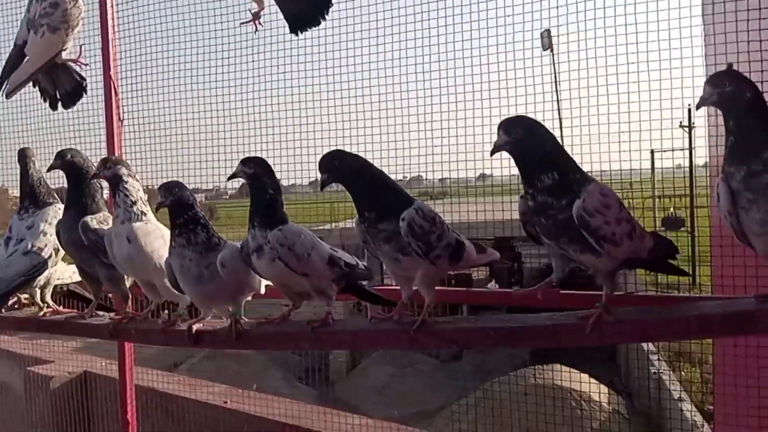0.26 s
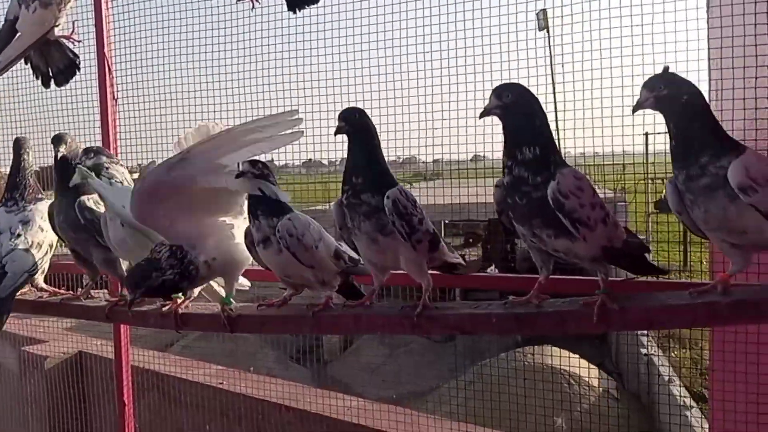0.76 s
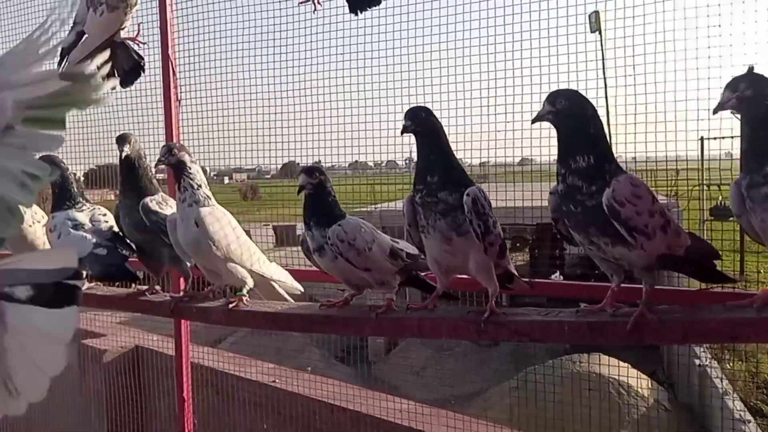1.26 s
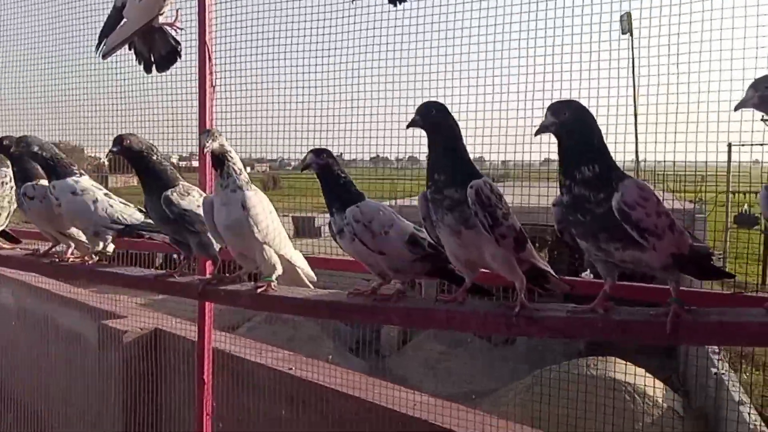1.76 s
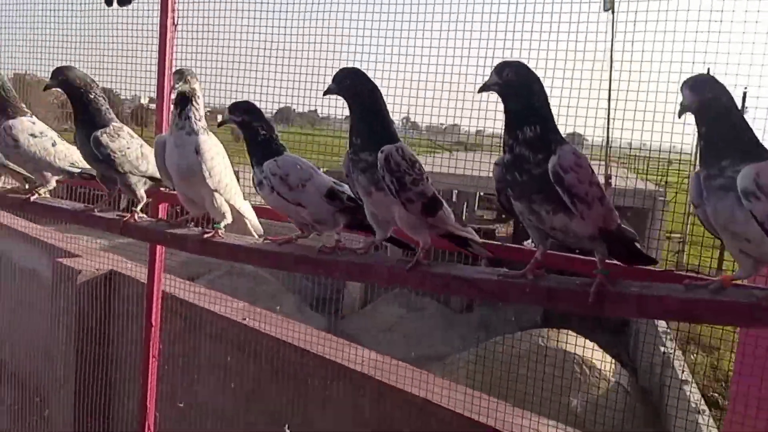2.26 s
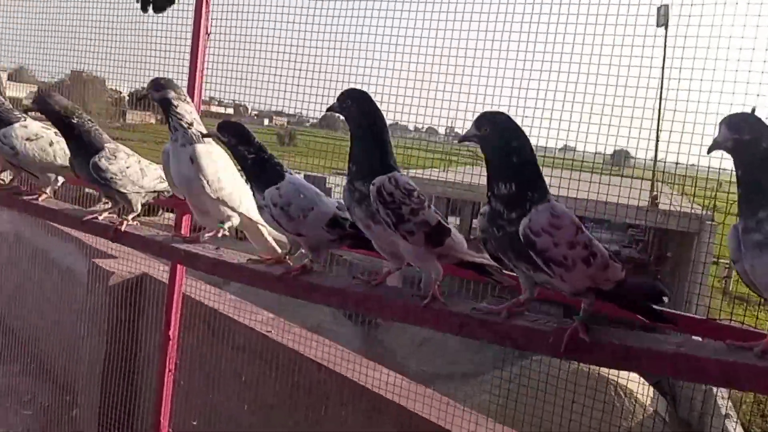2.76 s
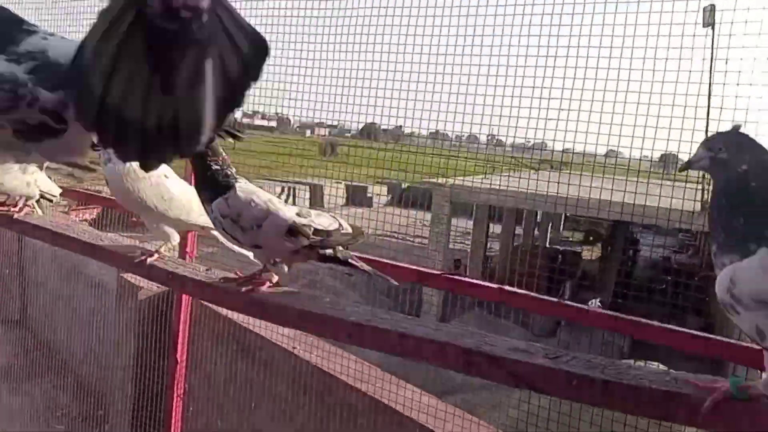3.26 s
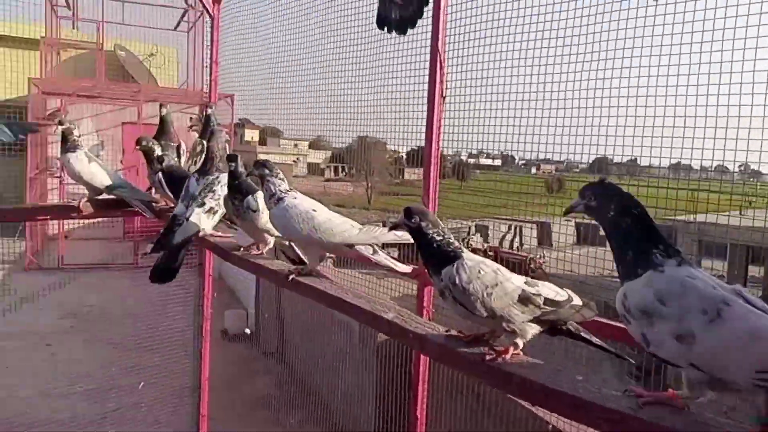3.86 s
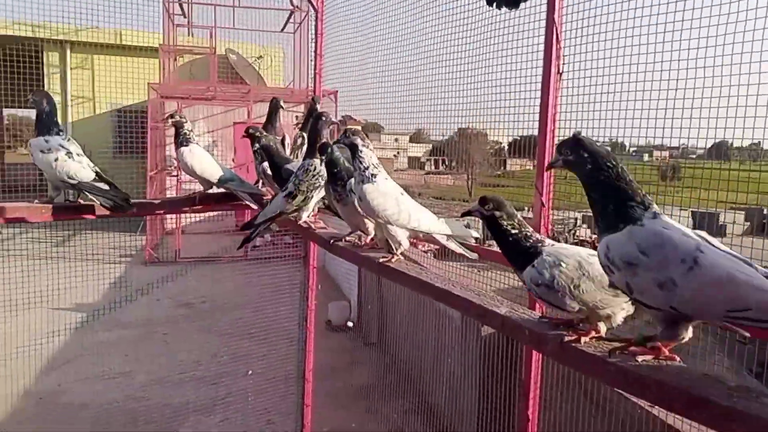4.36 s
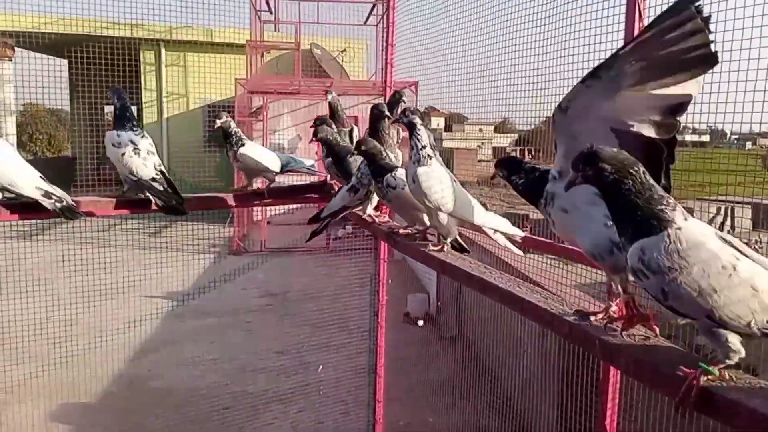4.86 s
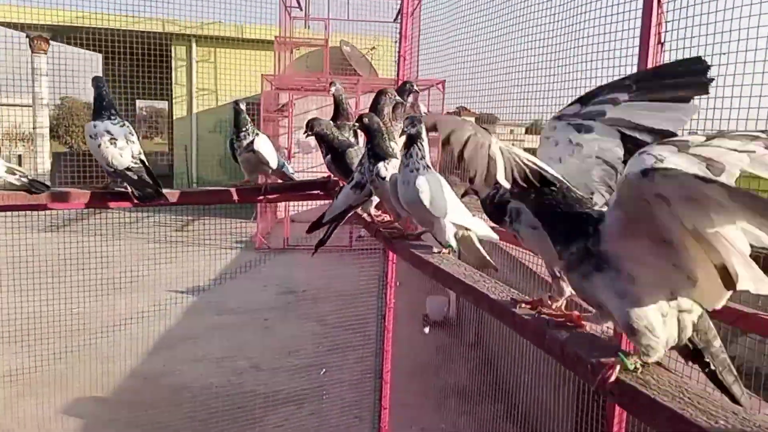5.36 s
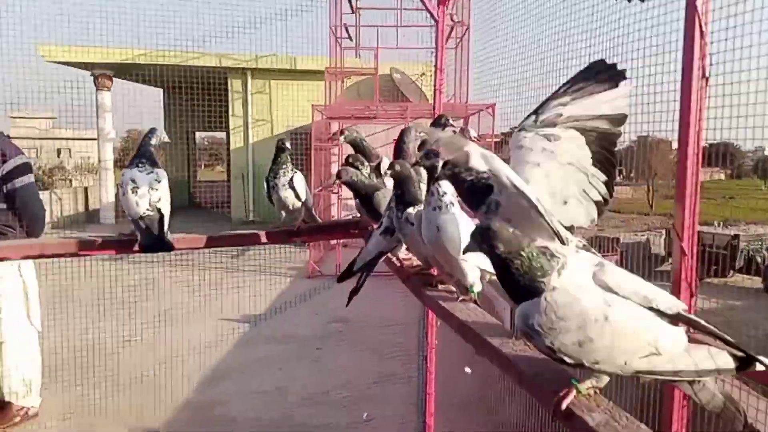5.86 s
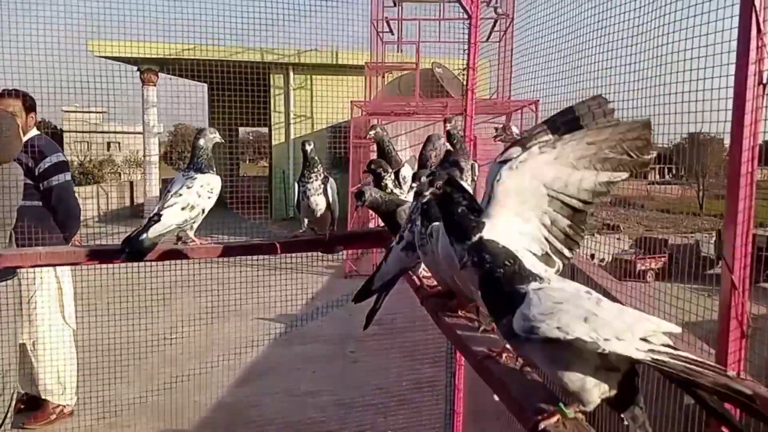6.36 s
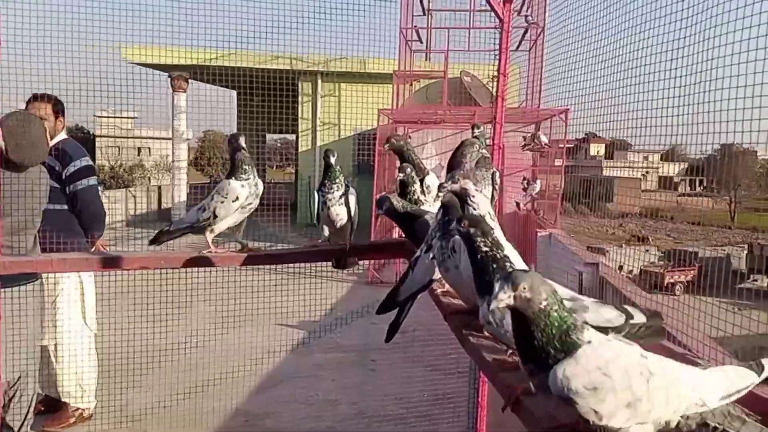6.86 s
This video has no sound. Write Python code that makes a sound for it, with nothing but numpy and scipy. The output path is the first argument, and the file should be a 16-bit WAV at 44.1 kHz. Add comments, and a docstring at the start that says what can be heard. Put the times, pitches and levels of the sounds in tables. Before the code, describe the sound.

Close pigeons flap in three bouts inside an open-air wire loft: a short flurry, a louder burst of claps and rustling feathers that buffets the microphone, then a longer run of lighter wingbeats. One soft coo follows the first bout and another comes during the last. Throughout, the birds give clipped clucks and their claws tap the metal perch and mesh, over a faint distant town drone.

```python
"""Pigeons crowd a steel perch in a wire loft on an open roof, close to a small microphone.
Over a far town rumble, birds cluck and shuffle, their feet ringing perch and mesh. At 1 s a wing claps
and a flurry follows: feathers rustle and push air at the microphone. Just after 2 s a bird coos, pulses
ringing its throat pouch. The biggest burst of flapping comes at 3-4 s. Near 5 s the town's drone drops
back; lighter wingbeats follow, with a second bird's coo around 6 s."""
import sys
import numpy as np
from scipy import signal
from scipy.io import wavfile
from scipy.ndimage import uniform_filter1d

SR = 44100
rng = np.random.default_rng(int(sys.argv[2]) if len(sys.argv) > 2 else 0)


def log_audio(samples):
    """Write samples as a 16-bit WAV file to the path given in sys.argv[1]."""
    # one column per channel
    frames = np.atleast_2d(samples).T
    # limit to full scale, then quantise
    limited = np.clip(frames, -1, 1)
    pcm = np.round(limited * 32767).astype(np.int16)
    wavfile.write(sys.argv[1], SR, pcm)


N = 313110
T = np.arange(N) / SR

# EQ curves for distant town wash, air on the microphone and feather rustle: f/Hz, level/dB
TOWN_EQ = [(15, -41.5), (25, -34), (103, 0.5), (182, -15.5), (226, -13), (378, -15), (902, -31.5),
           (1600, -5.5), (2530, -13), (3320, -44.5), (6380, -36), (8140, -41), (13300, -50.5),
           (15200, -6.5), (16500, -46.5)]
DRAUGHT_EQ = [(15, -31.5), (25, -13), (69, 5.5), (124, 9), (243, -1), (291, 4.5), (406, -2.5), (626, -7),
              (700, -1), (910, -41), (1540, -120)]
FEATHER_EQ = [(180, -32.5), (300, -4.5), (627, -9.5), (1310, -7.5), (2100, -4), (3300, 9), (4600, 2),
              (6200, -11.5), (7300, -18.5), (8300, -30.5), (10500, -29), (13300, -29), (15100, -6),
              (16500, -25.5)]
# faint hum under the opening: f/Hz, level/dB
HUM_TONES = [(233, -71)]
# ringing modes of the steel perch and mesh: f/Hz, level/dB, t60/s
PERCH_MODES = [(1282, -16.5, 0.11), (1602, -13, 0.071), (2225, -11.5, 0.087), (2580, -10.5, .08),
               (2956, -9.5, .06), (3240, -4.5, .08), (3580, -7, 0.065), (3953, -8.5, 0.065),
               (4476, -8, 0.081), (4900, -12.5, 0.041), (5610, -17.5, 0.064), (6480, -17, 0.044)]
# claws plucking mesh and perch: t/s, level/dB, f/Hz, t60/s, noisiness/0-1
CLAW_TINKS = [(2.56, -53, 3550, 0.077, 0), (2.82, -58, 2810, 0.12, 0), (3.87, -43, 3230, 0.076, .06),
              (4.27, -49, 3250, 0.066, 0.2), (4.55, -57, 2180, .08, 0), (4.8, -62.5, 11350, .083, .45),
              (4.948, -55, 6660, 0.049, 0.1), (5.133, -55.5, 6500, .07, 0.6), (5.75, -64, 9900, .04, 0.5),
              (6.33, -52, 7260, .06, 0.7), (6.508, -27, 4600, 0.02, 0.4), (6.877, -67, 7960, .043, .3)]
# short clucks and hollow knocks: t/s, level/dB, f/Hz, t60/s, noisiness/0-1
CLUCK_CUES = [(0.003, -47.5, 337.5, 0.28, 0.09), (0.084, -53.5, 344, 0.09, 0.4),
              (0.614, -59.5, 533, 0.23, 0.1), (0.674, -47, 726, 0.11, 0.36),
              (0.746, -40.5, 727, 0.12, 0.43), (0.819, -48, 758, 0.052, 0.65),
              (0.874, -48, 536, 0.15, 0.98), (0.939, -51.5, 653, 0.067, 0.15),
              (1.025, -33.5, 860, 0.033, 0.86), (1.282, -29.5, 354, 0.07, 0.98),
              (1.42, -27.5, 299, 0.13, 0.68), (1.666, -41.5, 902, 0.29, 0.5),
              (1.777, -36, 890, 0.061, 0.39), (1.848, -51, 720, 0.075, 0.2), (2.117, -48, 795, 0.13, 0.4),
              (2.287, -33, 404, 0.062, 0.9), (3.13, -25, 520, 0.061, 0.81), (3.187, -27, 710, 0.069, 1),
              (3.256, -31.5, 960, 0.26, 0.76), (3.308, -24.5, 299, 0.15, 0.51),
              (3.389, -28, 690, 0.18, 0.64), (3.438, -26, 286, 0.1, 0.65), (3.52, -24.5, 280, 0.11, 0.5),
              (3.557, -24, 643, 0.077, 0.57), (3.68, -23, 914, 0.062, 0.94), (3.804, -35, 332, 0.15, 0.54),
              (3.931, -48, 567, 0.11, 0.7), (4.804, -51, 355, 0.11, 0.24), (5.204, -36.5, 710, 0.054, 1),
              (5.27, -44.5, 500, 0.13, 0.94), (5.345, -53.5, 581, 0.28, 0.52),
              (5.456, -34, 399, 0.15, 0.34), (5.5, -42, 374.5, 0.14, 0.5), (5.59, -56.5, 382, 0.3, 0.4),
              (5.746, -42.5, 525, 0.11, 0.23), (6.27, -43.5, 427, 0.056, 0.6),
              (6.335, -46.5, 521, 0.18, 0.33), (6.416, -49, 327, 0.14, 0.02), (6.632, -36, 294, 0.12, 0.56),
              (6.716, -36.5, 600, 0.18, 0.97), (6.736, -31.5, 320, 0.092, 0.92),
              (6.993, -51, 704, 0.21, 0.3), (7.06, -55.5, 343, 0.3, 0.2)]
# two coos of two phrases each: pouch f/Hz, pouch spread/Hz, roughness/0-1,
# then a contour of t/s, pulse rate/Hz, level/dB, strong-weak alternation/ratio
COO_PHRASES = [(509, 68, 0.2, [(2.13, 176.4, -53, .5), (2.178, 165.8, -45, 1), (2.206, 155.2, -38, 0),
               (2.256, 151, -44.5, 0), (2.29, 149.8, -41, .2)]), (414, 78, 0.18, [(2.29, 146.5, -46, .1),
               (2.358, 143.5, -43, 0.018), (2.41, 141.6, -53, 0.082), (2.518, 134, -56.5, 0.12),
               (2.56, 142, -70, .02)]), (487, 48, 0.3, [(5.9, 154.4, -63, .5), (5.912, 162.3, -40.5, 0.27),
               (5.93, 170.6, -41, 0.74), (5.96, 156, -37.5, 2.7), (6.0, 158, -35.5, 0.17),
               (6.05, 149.5, -40, 0.85)]), (438, 64, .2, [(6.05, 138.1, -46.5, .1), (6.164, 145, -44, 0.26),
               (6.198, 138.4, -46, 0.36), (6.22, 145.1, -59, .2)])]
# the flock's steady bed of movement: t/s, rustle level/dB, draught level/dB
FLOCK_STIR = [(0.0, -58.5, -64.5), (0.34, -67, -72), (0.67, -55.5, -62.5), (1.14, -55.5, -73),
              (1.42, -42.5, -51), (1.54, -32.5, -53), (1.76, -60.5, -69), (1.92, -63, -68.5),
              (2.51, -65.5, -67.5), (3.0, -62, -73.5), (3.16, -42.5, -54), (3.3, -36, -35),
              (3.42, -29, -47), (3.68, -32, -36), (3.76, -29.5, -56), (3.85, -54, -48), (3.97, -50.5, -64),
              (4.71, -60, -66), (4.86, -62, -70), (5.85, -58, -68.5), (6.19, -52, -66.5),
              (6.47, -52.5, -67), (6.84, -64, -71.5), (7.1, -60, -65)]
# wing strokes: centre t/s, length/s, rustle level/dB, swish re rustle/dB, fizz re rustle/dB,
# draught level/dB, thud level/dB
WING_STROKES = [(0.071, 0.077, -52.5, -11, -13, -62, -82), (0.293, 0.094, -56.5, -12, -6.5, -66, -70),
                (0.568, 0.3, -56, -14, -7, -67, -83), (0.843, 0.13, -55, -6, -9, -66, -60),
                (1.047, 0.076, -58, -9, -33, -46.5, -71), (1.18, 0.073, -46.5, -1.5, -13, -55, -54),
                (1.237, 0.089, -38, -0.5, -30, -45.5, -68), (1.277, 0.079, -42, -2, -3, -42.5, -42.5),
                (1.361, 0.17, -32, -2, -10.5, -39.5, -44), (1.439, 0.041, -33.5, -0.5, -14, -44, -54),
                (1.539, 0.06, -27, -4, -18, -53, -54), (1.552, 0.037, -34, -8, -6, -57, -50),
                (1.609, 0.091, -41.5, 0.5, -39, -47.5, -49), (1.665, 0.098, -40, 2, -27, -63, -52),
                (1.804, 0.27, -57, -5, -9, -60.5, -49.5), (2.024, 0.1, -55, -8, -12, -73, -73),
                (2.134, 0.092, -49, -1.5, -25, -69, -78), (2.211, 0.2, -51, -5, -20, -60, -73),
                (3.155, 0.09, -29.5, -5.5, -9, -41, -44), (3.27, 0.068, -22, -7, -10, -35.5, -50),
                (3.311, 0.059, -34, -3, -6, -39, -55), (3.404, 0.1, -31, -1.5, -11, -30.5, -46),
                (3.478, 0.12, -29.5, -3, -7, -29.5, -40), (3.535, 0.068, -24.5, -5.5, -6, -27.5, -53),
                (3.621, 0.044, -40, 4.5, -14, -33.5, -54), (3.722, 0.09, -39, 5, -8, -39, -47),
                (3.795, 0.17, -33.5, -3, -14.5, -34.5, -43), (3.968, 0.086, -45.5, -11, -8, -74, -61),
                (4.374, 0.1, -54, 0.5, -15, -77, -78), (4.951, 0.046, -51.5, -17, -7, -86, -75),
                (5.142, 0.069, -53, -9, -6, -67, -80), (5.217, 0.086, -39, -5, -9.5, -59, -85),
                (5.289, 0.079, -39.5, -7, -9, -61, -85), (5.491, 0.087, -50, -21, -14, -75, -76),
                (5.673, 0.055, -54, -9, -13, -58, -77), (6.002, 0.2, -42.5, -5, -13.5, -59, -77),
                (6.136, 0.095, -47, -11, -16, -74, -84), (6.377, 0.056, -37.5, -12, -15, -59, -79),
                (6.526, 0.091, -34.5, -7.5, -20, -55, -80), (6.645, 0.077, -38, 3.5, -26, -63, -78),
                (6.744, 0.095, -39.5, 4, -27, -39.5, -39.5), (6.971, 0.061, -48, -12, -8, -64, -82),
                (7.09, 0.049, -53, -10, -12, -76, -78)]
# wing claps and claw ticks: t/s, mid-band peak/dB, low slap level/dB, high snap level/dB, ring f/Hz,
# feather tail t60/s, feather noise re crack/dB
CLAP_CUES = [(0.1003, -39.5, -53.5, -65, 3470, 0.081, 16), (0.3704, -40.5, -60, -56, 3740, 0.15, 15),
             (0.561, -41, -64, -56, 3970, 0.1, -6), (0.6602, -27.5, -47.5, -36.5, 3370, 0.079, -14),
             (0.7493, -38.5, -48, -58, 3300, 0.23, 0), (0.8745, -34.5, -48, -60, 3630, 0.094, -6),
             (0.89, -25, -44.5, -45.5, 3870, 0.081, -7), (1.0261, -5.5, -22.5, -27, 3460, 0.13, -12.5),
             (1.1764, -42, -47, -69, 1680, 0.093, -11), (1.2137, -34, -51, -65, 3850, 0.1, -14),
             (1.2361, -23.5, -36.5, -41.5, 3580, 0.15, -1), (1.277, -22, -33, -55, 3650, 0.091, 5),
             (1.3167, -19.5, -27, -46, 1510, 0.042, 1), (1.4199, -19, -29, -38, 3500, 0.092, 0),
             (1.4769, -28, -32, -72, 3450, 0.36, 1), (1.668, -16, -36, -36, 3780, 0.085, -10),
             (1.716, -34, -43.5, -66, 3370, 0.12, 3), (1.7708, -54, -43.5, -64, 3400, 0.18, 7),
             (1.8317, -42, -49.5, -68, 2360, 0.11, 0), (1.8873, -41, -47, -76, 3230, 0.13, 4),
             (1.9785, -47, -59.5, -81, 3190, 0.09, -1), (2.013, -40, -61, -59, 3170, 0.17, -3),
             (2.1171, -16.5, -34, -31.5, 3360, 0.18, -10), (2.2805, -39.5, -50.5, -81, 3250, 0.36, -17),
             (2.382, -47.5, -54, -81, 3290, 0.086, -1), (2.5551, -38, -63, -62, 3540, 0.13, 4),
             (2.6717, -44.5, -65, -68, 3600, 0.12, -6), (2.7328, -37.5, -60, -63, 3800, 0.12, -1),
             (3.0669, -36, -55, -58, 2330, 0.076, -15), (3.1312, -14, -30, -33, 3200, 0.16, 7),
             (3.188, -17.5, -30.5, -34, 3440, 0.29, -11), (3.2165, -13, -43, -35, 2800, 0.19, -14),
             (3.259, -4, -19.5, -26, 3120, 0.058, -20), (3.2928, -4.5, -34, -23.5, 3070, 0.19, -24.5),
             (3.3388, -14.5, -32.5, -31.5, 3380, 0.05, -19), (3.3669, -17, -36, -31.5, 3340, 0.15, -24),
             (3.3858, -6.5, -22, -21, 3530, 0.095, -4), (3.459, -12.5, -31, -28.5, 3480, 0.13, -4.5),
             (3.519, -13, -29, -32.5, 3600, 0.075, -10), (3.5781, -1.5, -25.5, -24.5, 3450, 0.056, -34),
             (3.6826, -3.5, -23, -22.5, 3490, 0.059, -14.5), (3.7648, -28, -31, -49, 3050, 0.089, -10),
             (3.8223, -17.5, -31.5, -40, 3440, 0.04, 6), (3.922, -37, -55, -58, 2660, 0.12, -3),
             (3.935, -29, -46, -49, 3530, 0.069, -8), (4.2093, -39, -61, -57, 3080, 0.084, -9),
             (4.2672, -47, -52, -63, 3240, 0.12, -6), (4.4344, -40, -65, -62, 3220, 0.14, -6),
             (4.5496, -38.5, -58, -65, 3120, 0.11, -2), (4.8174, -43, -68, -55, 3480, 0.12, -6),
             (4.919, -42, -63, -54.5, 3210, 0.11, 3), (5.019, -42.5, -58.5, -65, 3160, 0.073, -9),
             (5.2024, -25.5, -37.5, -49, 3370, 0.066, 2), (5.277, -23.5, -42, -45, 3300, 0.059, -4),
             (5.345, -32.5, -52, -51.5, 3390, 0.15, -7), (5.4074, -35.5, -45.5, -57, 2880, 0.16, -13),
             (5.4867, -33.5, -51, -60, 3380, 0.11, 4), (5.5019, -31.5, -41.5, -51, 2980, 0.11, 0),
             (5.5547, -42, -51.5, -64, 1850, 0.077, 2), (5.6462, -44, -62, -59, 3200, 0.17, -2),
             (5.7114, -40, -58, -65, 3350, 0.2, -3), (5.7494, -23.5, -51, -42.5, 3500, 0.063, -14),
             (5.7947, -37, -57, -51, 3380, 0.13, 3), (5.8822, -30, -42, -57, 2310, 0.097, 8),
             (5.914, -29.5, -47, -50.5, 3320, 0.12, 1), (6.0025, -23, -28, -66, 2420, 0.047, -3),
             (6.0312, -26, -43, -44, 3520, 0.11, -2), (6.1492, -38.5, -69, -63, 3680, 0.12, 1),
             (6.2134, -24, -31.5, -55, 2410, 0.073, 8), (6.24, -21.5, -33, -53, 3140, 0.11, -9),
             (6.2701, -28.5, -55, -44, 3240, 0.24, -6), (6.3096, -26.5, -48, -44.5, 3160, 0.086, -3),
             (6.334, -23.5, -43, -41, 3330, 0.12, -4), (6.3655, -27, -58, -43, 3180, 0.13, -1),
             (6.4002, -14, -42.5, -32, 3520, 0.12, -18), (6.4448, -31, -45.5, -71, 2860, 0.1, -6),
             (6.4937, -34, -60, -50.5, 2900, 0.17, -9), (6.5211, -7, -36, -25, 3460, 0.04, 0),
             (6.573, -25, -44, -75, 2600, 0.13, -13), (6.6227, -22.5, -27.5, -59, 1720, 0.049, -11.5),
             (6.7242, -36, -37.5, -53, 3240, 0.19, 10), (6.8216, -34.5, -52, -53.5, 3200, 0.056, -7),
             (6.9042, -40, -57, -81, 3270, 0.15, -11), (6.975, -33, -53, -50.5, 3270, 0.072, -7)]

LOW_HZ, MID_HZ, HIGH_HZ = (480, 2000), (2000, 6000), (6000, 17000)


def gain_of(db):
    """Decibels to amplitude."""
    return 10 ** (np.asarray(db) / 20)


def unit_rms(x):
    """Normalises to rms 1."""
    return x / np.sqrt(np.mean(x ** 2) + 1e-20)


def add(mix, start_s, sound):
    """Lays a sound into the mix."""
    part = mix[max(round(start_s * SR), 0):][:len(sound)]
    part += sound[:len(part)]


def colour(x, eq, inlet_hz=3484, inlet_width_hz=1080, inlet_db=8):
    """Minimum-phase EQ, plus the presence peak of the microphone's resonating inlet."""
    eq_hz, eq_db = np.transpose(eq)
    hz = abs(np.fft.fftfreq(8192, 1 / SR))
    presence_db = inlet_db / (1 + (2 * (hz - inlet_hz) / inlet_width_hz) ** 2)
    curve_db = np.interp(np.log(hz + 1), np.log(eq_hz + 1), eq_db) + presence_db
    log_gain = np.log(gain_of(np.maximum(curve_db, -100)))
    taps = np.fft.ifft(np.exp(np.conj(signal.hilbert(log_gain)))).real[:4096]
    return signal.oaconvolve(x, taps)[:len(x)]


def band(x, edges_hz):
    """Band-pass filter."""
    return signal.sosfilt(signal.butter(3, edges_hz, "bandpass", fs=SR, output="sos"), x)


def resonate(x, hz, width_hz):
    """Two resonators in series; each shifts hz (steady or gliding) to zero, smooths and shifts back."""
    carrier = np.exp(2j * np.pi * np.cumsum(hz * np.ones(len(x))) / SR)
    pole = np.exp(-np.pi * width_hz / SR)
    for _ in range(2):
        x = 2 * (carrier * signal.lfilter([1 - pole], [1, -pole], x / carrier + 1e-18)).real
    return x


def wander(seconds):
    """Smooth random modulator of rms 1 that moves over about the given time."""
    size = max(round(seconds * SR), 2)
    return unit_rms(uniform_filter1d(uniform_filter1d(rng.standard_normal(N), size), size))


def town(wash_db=-75, drone_hz=116, drone_db=-63.5, drop_at_s=4.8, drop_db=-15.5, hum_ends_s=1.2):
    """Distant rumble and hiss, a low drone that drops back late, and a wavering hum that fades early."""
    wash = unit_rms(colour(rng.standard_normal(N), TOWN_EQ)) * gain_of(wash_db - 0.2 * wander(0.12))
    hum = sum(gain_of(db + 8.5 * wander(0.042)) * np.sin(2 * np.pi * hz * T) for hz, db in HUM_TONES)
    hum *= np.clip((hum_ends_s - T) / 0.36, 0, 1)
    drone = unit_rms(resonate(rng.standard_normal(N), drone_hz, width_hz=49))
    drone *= gain_of(drone_db + drop_db * np.clip((T - drop_at_s) / 0.11, 0, 1))
    return wash + drone + hum


def roof_echo(x, t60=0.42, predelay_s=0.0029):
    """Sparse reflections off the roof's floor and walls."""
    t = np.arange(round(.3 * SR)) / SR
    taps = rng.standard_normal(len(t)) * (rng.random(len(t)) < .05)
    taps *= (t > predelay_s) * gain_of(-60 * t / t60)
    return signal.oaconvolve(x, taps / np.linalg.norm(taps))[:N]


def perch(hits, steps_per_s=45, steps_re_rustle_db=-6, shake_db=-18.5):
    """Shuffling feet tap the steel, each tap waking its own mix of modes; claps shake it too."""
    stir_s, stir_db, _ = np.transpose(FLOCK_STIR)
    footfalls = np.flatnonzero(rng.random(N) < steps_per_s / SR)
    weight_db = 2.5 * np.minimum(rng.exponential(1, len(footfalls)), 3)
    timbre_db = 7.5 * rng.uniform(-1.1, 1, (len(footfalls), len(PERCH_MODES)))
    t = np.arange(round(.15 * SR)) / SR
    attack = np.minimum(t / 0.0019, 1)
    steps, ring = np.zeros(N), np.zeros(len(t))
    for (hz, db, t60), mode_db in zip(PERCH_MODES, timbre_db.T):
        mode = gain_of(db - 60 * t / t60) * np.sin(2 * np.pi * hz * t) * attack
        taps = np.zeros(N)
        taps[footfalls] = gain_of(weight_db + mode_db)
        steps += signal.oaconvolve(taps, mode)[:N]
        ring += mode
    shaken = gain_of(shake_db) * np.std(hits) * unit_rms(signal.oaconvolve(hits, ring)[:N])
    return unit_rms(steps) * gain_of(np.interp(T, stir_s, stir_db) + steps_re_rustle_db) + shaken


def blips(cues, attack_s, blur_hz, sag_per_s):
    """Short decaying tones, each blended with noise around its own pitch."""
    track, t = np.zeros(N), np.arange(round(.25 * SR)) / SR
    for start_s, db, hz, t60, noisiness in cues:
        pitch = hz * np.exp(-sag_per_s * t)
        tone = np.sqrt(2) * np.sin(2 * np.pi * np.cumsum(pitch) / SR)
        width_hz = blur_hz * (1 + 1.85 * noisiness ** 2)
        fuzz = unit_rms(resonate(rng.standard_normal(len(t)), pitch, width_hz))
        envelope = (1 - np.exp(-t / attack_s)) * gain_of(-60 * t / t60)
        blend = (1 - noisiness) * tone + noisiness * fuzz
        add(track, start_s, gain_of(db) * envelope / envelope.max() * blend)
    return track


def claw_tinks():
    """Claws pluck the wire and the perch: small, bright pings of steady pitch."""
    return blips(CLAW_TINKS, attack_s=0.0014, blur_hz=600, sag_per_s=0)


def clucks():
    """Clipped calls and hollow knocks that sag in pitch as they die."""
    return blips(CLUCK_CUES, attack_s=0.00047, blur_hz=122, sag_per_s=0.7)


def coo(pouch_hz, spread_hz, roughness, contour):
    """Pulses ring the inflated throat pouch; uneven pulse pairs add partials between the harmonics."""
    times, *curves = np.transpose(contour)
    t = np.arange(times[0], times[-1], 1 / SR)
    pulse_hz, db, alternation = (np.interp(t, times, curve) for curve in curves)
    cycles = np.cumsum(pulse_hz) / SR
    ratios = np.arange(2, 16)[:, None] / 2
    formant = np.exp(-.5 * ((ratios * pulse_hz - pouch_hz) / spread_hz) ** 2)
    partials = np.where(ratios % 1, alternation, 1) * formant
    voice = (partials * np.cos(2 * np.pi * ratios * cycles)).sum(0)
    voice /= np.sqrt((partials ** 2).sum(0) / 2)
    breath = unit_rms(resonate(rng.standard_normal(len(t)), pouch_hz, width_hz=180))
    blend = (1 - roughness) * voice + roughness * breath
    return times[0], gain_of(db) * blend * signal.windows.tukey(len(t), .08)


def stroke_envelope(bed_db, strokes_db):
    """Gain ride: the flock's steady stir plus one smooth swell of power per wing stroke."""
    power = gain_of(2 * np.interp(T, [row[0] for row in FLOCK_STIR], bed_db))
    for (centre_s, length_s, *_), db in zip(WING_STROKES, strokes_db):
        add(power, centre_s - length_s / 2, gain_of(2 * db) * np.hanning(round(length_s * SR)) ** 2)
    return np.sqrt(power)


def turning_wings(x, streak_db=3.5, shading_db=2.5):
    """Drifting random EQ: narrow streaks, and broad shading as the wings turn."""
    spectrum = signal.stft(x, nperseg=512, noverlap=384)[2]
    fine, broad = rng.standard_normal((2, *spectrum.shape))
    streaks = uniform_filter1d(uniform_filter1d(fine, size=16, axis=1), size=2, axis=0)
    shading = uniform_filter1d(uniform_filter1d(broad, size=14, axis=1), size=14, axis=0)
    drift_db = streak_db * unit_rms(streaks) + shading_db * unit_rms(shading)
    return signal.istft(spectrum * gain_of(drift_db), nperseg=512, noverlap=384)[1][:len(x)]


def feathers(crackles_per_s=260, crackle_db=-6):
    """Sliding feathers make a flickering hiss flecked with crackle."""
    hiss = rng.standard_normal(N) * gain_of(2 * wander(0.013) + 1.5 * wander(0.02))
    sizes = gain_of(-3.5 * np.minimum(rng.exponential(1, N), 4)) * rng.standard_normal(N)
    crackle = sizes * (rng.random(N) < crackles_per_s / SR)
    texture = unit_rms(hiss) + gain_of(crackle_db) * unit_rms(crackle)
    return colour(turning_wings(texture), FEATHER_EQ)


def wings(buffet_db=6.5):
    """Each stroke swells the feather noise, and the air it moves buffets the microphone."""
    _, stir_db, breeze_db = np.transpose(FLOCK_STIR)
    _, _, rustle_db, swish_db, fizz_db, draught_db, thud_db = np.transpose(WING_STROKES)
    texture = feathers()
    swish = unit_rms(band(texture, LOW_HZ)) * stroke_envelope(stir_db - 6.5, rustle_db + swish_db)
    rustle = unit_rms(band(texture, MID_HZ)) * stroke_envelope(stir_db, rustle_db)
    fizz = unit_rms(band(texture, HIGH_HZ)) * stroke_envelope(stir_db - 12, rustle_db + fizz_db)
    air = colour(rng.standard_normal(N), DRAUGHT_EQ) * gain_of(buffet_db * np.tanh(wander(0.028)))
    draught = unit_rms(band(air, (80, 900))) * stroke_envelope(breeze_db, draught_db)
    thud = unit_rms(band(air, (20, 80))) * stroke_envelope(breeze_db - 11, thud_db)
    return swish + rustle + fizz + draught + thud


def claps(preroll_s=.03, crack_rise_s=0.00034, crack_fall_s=0.00039, bounce_db=-9, ring_db=-4.5):
    """Wing claps and claw ticks: a crack over feather noise; the wing's hollow or the perch rings."""
    track = np.zeros(N)
    t = np.arange(round(.2 * SR)) / SR - preroll_s
    crack = np.exp(np.where(t < 0, t / crack_rise_s, -t / crack_fall_s))
    whoosh = gain_of(-20) * np.exp(-abs(t) / 0.006)  # starts before the wing lands
    noises = rng.standard_normal((len(CLAP_CUES), len(t)))
    lags = rng.integers(50, 160, len(CLAP_CUES))
    for cue, noise, lag in zip(CLAP_CUES, noises, lags):
        hit_s, peak_db, slap_db, snap_db, ring_hz, t60, body_db = cue
        body = np.where(t < 0, np.exp(t / 0.0012), gain_of(-60 * t / t60))
        drive = noise * (crack + gain_of(body_db) * (body + whoosh))
        drive[round(preroll_s * SR)] += 2.9  # the instant the quills meet
        drive += gain_of(bounce_db) * np.roll(drive, lag)  # off a surface under a metre away
        burst = colour(drive, FEATHER_EQ)
        ring = unit_rms(resonate(drive, ring_hz, width_hz=530)) * np.std(burst)
        burst += gain_of(ring_db) * ring
        mids = band(burst, MID_HZ)
        clap = gain_of(peak_db) * mids / abs(mids).max()
        for db, edges_hz in ((slap_db, (584, 2000)), (snap_db, HIGH_HZ)):
            layer = band(burst, edges_hz)
            loudest_rms = np.sqrt(uniform_filter1d(layer ** 2, 200).max())
            clap += gain_of(db) * layer / loudest_rms
        add(track, hit_s - preroll_s, clap)
    return track


def scene(echo_db=-22.5):
    """Mono mix: hits and calls with a touch of roof echo, over dry wing noise and the town."""
    hits = claps()
    birds = hits + perch(hits) + clucks() + claw_tinks()
    for phrase in COO_PHRASES:
        add(birds, *coo(*phrase))
    return (birds + gain_of(echo_db) * roof_echo(birds) + wings() + town())[None]


def record(dry, cutoff_hz=15950):
    """A steep low-pass trims the very top."""
    lowpass = signal.firwin(511, cutoff_hz, window=("kaiser", 9), fs=SR)
    return signal.oaconvolve(dry, lowpass[None], "same")


dry = scene()
out = record(dry)
log_audio(out)
```